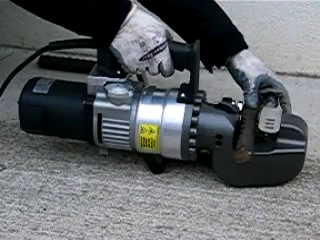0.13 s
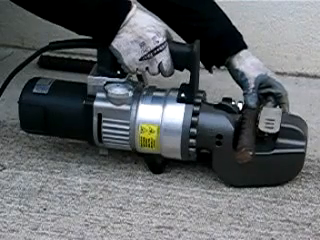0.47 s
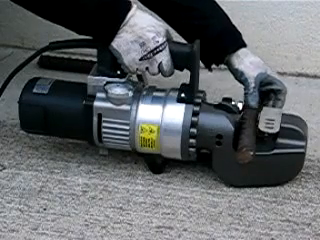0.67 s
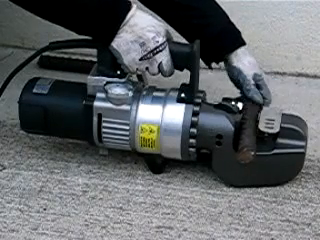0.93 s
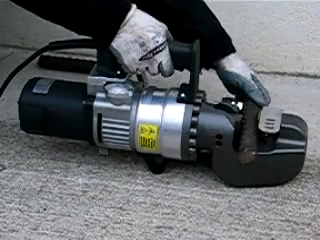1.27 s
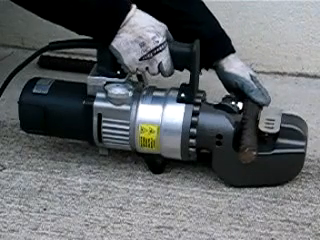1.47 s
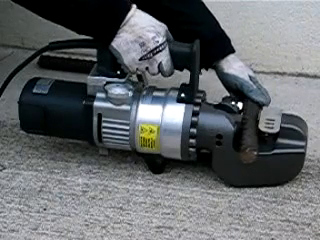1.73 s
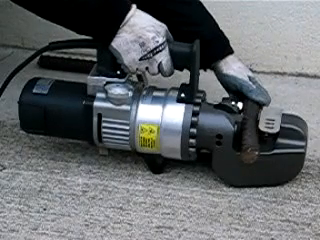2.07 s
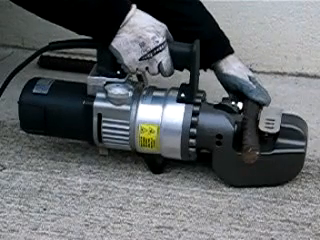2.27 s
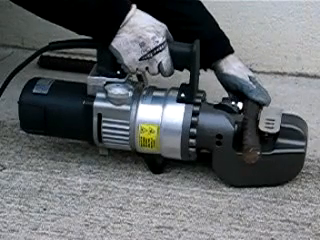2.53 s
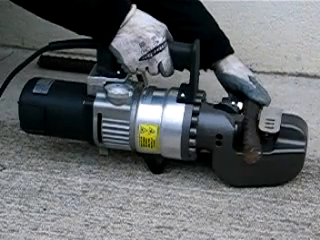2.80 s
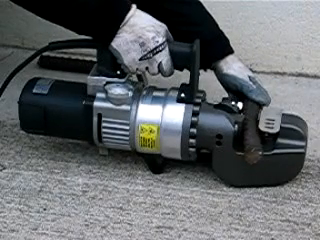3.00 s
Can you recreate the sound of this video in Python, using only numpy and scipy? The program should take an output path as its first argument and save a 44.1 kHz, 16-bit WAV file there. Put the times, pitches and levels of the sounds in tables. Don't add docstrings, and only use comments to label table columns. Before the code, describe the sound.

A loud, buzzy power-shear motor whine glides downward by about an octave as it bites steel

```python
import sys
import numpy as np
from scipy import signal
from scipy.fft import rfft, irfft, next_fast_len
from scipy.io import wavfile
from scipy.ndimage import uniform_filter1d

SR = 44100
rng = np.random.default_rng(int(sys.argv[2]) if len(sys.argv) > 2 else 0)


def natural_amplitude(level_db):
    exponent = np.asarray(level_db, float) / 20
    return 10 ** exponent


def to_wav(sig):
    pcm = np.clip(np.atleast_2d(sig), -1, 1) * 32767
    pcm = np.round(pcm).astype(np.int16)
    wavfile.write(sys.argv[1], SR, pcm.T)


N = 140238


def unit(x):
    return x / np.sqrt(np.mean(x ** 2) + 1e-20)


def along(points, hz):
    f, v = np.transpose(points)
    return natural_amplitude(np.interp(np.log(hz + 1), np.log(f + 1), v))


def curves(rows):
    s, *cols = np.transpose(rows)
    return [np.interp(np.arange(N) / SR, s, c) for c in cols]


def wobble(rate):
    return np.interp(np.arange(N) * rate / SR, np.arange(200), rng.standard_normal(200))


def filtered(x, response):
    m = next_fast_len(N + 8192)
    return irfft(rfft(x, m) * response(np.fft.rfftfreq(m, 1 / SR)), m)[:N]


def noise(spectrum):
    return unit(filtered(rng.standard_normal(N), lambda hz: along(spectrum, hz)))


def motor():
    # time in seconds, shaft speed in Hz, level in dB
    shaft_course = [(0.0, 221.6, -23.5), (0.19, 224.2, -25.5), (0.26, 222, -24.5), (0.35, 219.2, -24.5),
                    (0.45, 211.6, -24.5), (0.7, 193.1, -25), (0.9, 176.3, -23.5), (1.14, 157.1, -25.5),
                    (1.34, 145.4, -23), (1.49, 138.6, -23.5), (1.56, 135.8, -24), (1.81, 128.7, -24.5),
                    (2.01, 125.1, -24.5), (2.15, 123.7, -24), (2.63, 115.8, -24), (2.73, 115.4, -24.5),
                    (3.18, 110.7, -24)]
    hiss_loads = [0, .25, .65, 1]
    hiss_load_db = [-0.98, -1.6, 0.49, 1]
    free_hz, loaded_hz, speed_jitter = 223, 111, 0.00049
    tones_db, hiss_db = -1.5, -6.5

    speed_hz, level_db = curves(shaft_course)
    speed_hz = uniform_filter1d(speed_hz, size=3001, mode="nearest")
    turn = 2 * np.pi * np.cumsum(speed_hz * (1 + speed_jitter * wobble(30))) / SR
    load = np.clip((free_hz - speed_hz) / (free_hz - loaded_hz), 0, 1)

    tones = natural_amplitude(tones_db) * shaft_orders(turn, load)
    hiss = natural_amplitude(hiss_db + np.interp(load, hiss_loads, hiss_load_db)) * brush_hiss(turn)
    return natural_amplitude(level_db) * (tones + hiss) + shudder(turn)


def shaft_orders(turn, load):
    # levels of eight successive shaft orders in dB, motor running free
    free_db = [(-18.5, -4, -11, -24.5, 4.5, 2, -3, 0.5), (-5, 10, 10, -4.5, 8, -6, 3, 5),
               (1, 13, 8, -10, 3.5, 5.5, 8.5, 0.5), (5, -7.5, -0.5, -3.5, 0, 5, -11.5, -20),
               (-3, 9.5, -16.5, 1, -20, 2.5, -3, -10.5), (-16.5, -4.5, 19.5, 2.5, 5, -4.5, 18, -3)]
    biting_db = [(-7.5, -13.5, -2.5, -1.5, 4.5, -5.5, 1.5, 2), (5, -1, 2.5, 7, 13.5, 2.5, 6.5, 9.5),
                 (10.5, -2.5, 12, 1, 10.5, 3, 0.5, 13), (-3.5, -2, 2.5, -3, 5.2, 9.5, -3.5, -13.5),
                 (0.3, 3.5, -6.5, -6, -8.5, 5, -5, 1.5), (-1.5, 3.5, 7.5, -3.5, 3, -5, -4.5, -4.5)]
    loaded_db = [(-2, -23, -20, -1, 5.5, -5.5, 7, 12), (3, 8.5, -8, 5, 8, -2.5, 3, 3.5),
                 (5, 8, 6, -4, -2, 7.5, -6, 0), (0.5, -0.5, 9.5, 0.5, 2.5, 10, -0.5, -6.5),
                 (12.5, 2, 3.5, 0, -17.5, 6.5, -2, -7.5), (-5, -27, 3.5, -8, -12, -6, -0.5, -21)]
    # time in seconds, phase scatter 0-1
    phase_scatter = [
        (0, 1),
        (.4, .9),
        (.55, .4),
        (.68, .4),
        (.82, .8),
        (1.0, .55),
        (1.2, .9),
        (3.18, 1),
    ]
    biting_load, waver_db, blur_rad = 0.6, 1.8, 0.07

    scatter, = curves(phase_scatter)
    stages = zip(np.ravel(free_db), np.ravel(biting_db), np.ravel(loaded_db))
    orders = np.zeros(N)
    for order, stages_db in enumerate(stages, 1):
        order_db = np.interp(load, [0, biting_load, 1], stages_db)
        order_db = order_db + shifted_db(order) + waver_db * wobble(14)
        start_phase = scatter * rng.uniform(-np.pi, np.pi)
        blur = blur_rad * load * max(order - 25, 0) * wobble(50)
        orders += natural_amplitude(order_db) * np.sin(order * turn + start_phase + blur)
    return unit(filtered(orders, lambda hz: abs(housing(hz))))


def shifted_db(order):
    # start in seconds, length in seconds, shaft order, change in dB
    order_shifts = [(0.159, 0.79, 20, 6), (0.2, 0.38, 18, -8), (0.202, 1.2, 13, -0.5),
                    (0.28, 0.16, 12, 17.5), (0.383, 0.33, 17, 9.5), (0.4, 1.8, 15, -3), (0.638, 0.45, 18, 6),
                    (0.78, 1, 30, -7.5), (0.919, 0.33, 25, 14.5), (1.02, 0.88, 16, -5),
                    (1.04, 0.48, 24, -11.5), (1.061, 0.8, 10, 7.5), (1.08, 3, 33, -1.5),
                    (1.16, 0.38, 34, -13), (1.181, 0.38, 19, -14.5), (1.262, 1.3, 38, 1),
                    (1.399, 0.77, 12, -10.5), (1.438, 0.87, 27, -5), (1.623, 1.54, 22, -8),
                    (1.742, 0.93, 29, 3.5), (1.779, 0.28, 17, 6), (1.881, 1.6, 32, -1.5),
                    (2.138, 0.62, 25, -7.5), (2.181, 0.98, 30, -2), (2.239, 0.54, 17, -11.5),
                    (2.622, 0.35, 28, 5), (2.658, 0.58, 13, -7.5), (2.74, 0.25, 34, 3),
                    (0, 0.13, 11, 6),
        (-0.5, 0.46, 16, 4),
        (-1.7, 0.14, 19, 5),
        (0.8, .2, 8, 7.5),
        (3, 1.1, 27, 0),
        (1.5, 0.26, 7, -3.5),
        (2.26, 2, 43, -8),
        (1.5, 1.7, 46, -7),
                    (0.0, 0.11, 15, -7.5), (0.0, 0.092, 16, 5.5), (0.0, 0.36, 25, 8),
                      (0.0, 0.87, 20, 9.5), (0.0, 0.52, 15, -1.5), (0.122, 0.72, 14, 8.5),
                      (0.156, 0.12, 19, 7.5), (0.202, 0.16, 21, 5.5), (0.323, 0.72, 19, -4),
                      (0.364, 0.83, 25, -2), (0.48, 0.28, 9, 7), (0.48, 0.41, 16, -8),
                      (0.523, 0.48, 24, -1.5), (0.638, 0.6, 23, 0), (0.714, 0.22, 11, -8.5),
                      (0.802, 0.36, 9, -10), (0.84, 0.76, 29, -6), (0.879, 0.13, 13, -12),
                      (0.9, 0.12, 21, -8), (0.877, 0.65, 32, 6.5), (1.043, 0.13, 20, -11.5),
                      (1.159, 0.12, 14, 5.5), (1.158, 0.76, 20, 5.5), (1.203, 0.6, 33, -0.5),
                      (1.198, 0.88, 37, 6.5), (1.275, 0.85, 13, -4),
                    (1.32, 0.93, 38, -12), (1.362, 0.72, 31, 4), (1.396, 0.071, 24, 11),
                       (1.399, 0.64, 21, -4), (1.44, 0.18, 15, 6), (1.44, 0.64, 35, -7.2),
                       (1.521, 0.13, 26, -13), (1.558, 0.32, 9, 9), (1.606, 0.26, 19, -6),
                       (1.631, 0.31, 23, 3), (1.644, 0.43, 28, -9.5), (1.88, 0.44, 32, 9.5),
                       (2.082, 0.24, 15, -14.5), (2.166, 0.16, 30, -3), (2.165, 0.24, 33, -6.5),
                       (2.2, 0.87, 31, 2.5), (2.199, 0.88, 23, 3.5), (2.204, 0.92, 38, -8),
                       (2.321, 0.28, 22, 7), (2.368, 0.69, 32, 10), (2.4, 0.35, 30, -13.5),
                       (2.4, 0.59, 35, -10), (2.521, 0.49, 37, 18), (2.519, 0.89, 41, -12.5),
                       (2.597, 0.22, 39, 5), (2.597, 0.56, 15, -4.5), (2.598, 0.67, 33, -1.5),
                       (2.684, 0.48, 11, 12), (2.685, 0.61, 21, 6.5), (2.723, 0.52, 24, 8.5),
                       (2.84, 0.16, 20, 10.5), (2.921, 0.18, 28, 3), (3.0, 0.16, 16, 6.5),
                       (3.0, 0.1, 27, -5.5)]

    steps = np.zeros(N)
    for s, length, k, db in order_shifts:
        if round(k) == order:
            start, stop = round(s * SR), round((s + length) * SR)
            steps[max(start, 0):max(stop, 0)] += db
    return uniform_filter1d(steps, size=1601, mode="nearest")


def housing(f):
    # resonance in Hz, width in Hz, level in dB
    casing_modes = [(202, 81, -6.5), (570, 169, -3), (933.4, 48.7, -0.5), (1332, 134, -11),
                    (1641, 93.4, -1), (2023, 119, -5), (2502, 111, -9), (2838, 142, -2.5), (3130, 203, -1),
                    (3736, 363, -4.5), (4367, 85, -7.5), (4523, 63, -3.5), (4890, 280, -6),
                    (5334, 115, -1.5)]
    response = 0
    for k, (centre, width, db) in enumerate(casing_modes):
        damping = 1j * f * width
        response = response + (-1) ** k * natural_amplitude(db) * damping / (centre * centre - f * f + damping)
    return response


def brush_hiss(turn):
    # frequency in Hz, level in dB per Hz
    hiss_colour = [(100, -18.5), (400, -1.5), (1200, 0.5), (2300, 4), (3000, 1.5), (4000, 6.5), (5000, 1),
                   (6000, 6)]
    gated, direct = 0.34, 0.38
    brushes = noise(hiss_colour) * (1 + gated * np.cos(turn))
    hiss = unit(filtered(brushes, lambda hz: direct + abs(housing(hz))))
    return unit(patchy(hiss, depth_db=2))


def patchy(x, depth_db):
    z = signal.stft(x, nperseg=512)[2]
    field = uniform_filter1d(rng.standard_normal(z.shape), size=5, axis=0)
    field = uniform_filter1d(field, size=20, axis=1)
    return signal.istft(z * natural_amplitude(depth_db * unit(field)), nperseg=512)[1][:N]


def shudder(turn):
    # frequency in Hz, level in dB per Hz
    groan_colour = [(70, -16), (120, -3), (170, -14), (240, -5), (330, -12.5), (450, -26)]
    start_s, rise_s = 2.6, 0.12
    shake_db, rough_db, groan_db = -41, 2.5, -42
    onset = np.clip((np.arange(N) / SR - start_s) / rise_s, 0, 1)
    shake = natural_amplitude(shake_db + rough_db * wobble(35)) * np.sqrt(2) * np.sin(2 * turn)
    return onset * (shake + natural_amplitude(groan_db) * noise(groan_colour))


def scrape():
    # time in seconds, level in dB
    scrape_course = [
        (0, -36),
        (.15, -35),
        (.22, -42.5),
        (.5, -42),
        (.9, -45.5),
        (1.4, -68),
    ]
    # frequency in Hz, level in dB per Hz
    jaw_colour = [(120, -6.5), (300, -1.5), (550, 6.5), (800, -7), (1100, -34.5), (2500, -2.5),
                  (4000, -19.5)]
    level_db, = curves(scrape_course)
    return natural_amplitude(level_db + 1.5 * wobble(45)) * noise(jaw_colour)


def bite():
    # frequency in Hz, level in dB per Hz
    chatter_colour = [(2300, -32), (2900, -8), (3400, 2), (4200, -3.5), (5000, -20)]
    start_s, length_s, bite_db = 0.145, 0.085, -33
    u = (np.arange(N) / SR - start_s) / length_s
    envelope = np.clip(np.minimum(8 * u, 2 * (1 - u)), 0, 1)
    return natural_amplitude(bite_db + 1.5 * wobble(46)) * envelope * noise(chatter_colour)


def yard():
    # frequency in Hz, level in dB per Hz
    rumble_colour = [(20, -4.5), (32, -9.5), (45, -5), (72, -20), (135, -11), (165, -12), (250, -15.5),
                     (450, -28.5)]
    # frequency in Hz, level in dB rms
    hum_tones = [(102.3, -59), (209.9, -54.5)]
    t = np.arange(N) / SR
    hum = np.zeros(N)
    for hz, db in hum_tones:
        hum += natural_amplitude(db + 1.5 * wobble(5.0)) * np.sqrt(2) * np.sin(2 * np.pi * hz * t)
    skirted = [(8, -22.0)] + list(rumble_colour) + [(900, -70.0)]
    return natural_amplitude(-50 + 4.2 * wobble(6.1)) * noise(skirted) + hum


def scene():
    return (motor() + scrape() + bite() + yard())[None]


def coarse_sampling(x):
    # frequency in Hz, gain in dB
    before_sampling = [(4500, 0), (5500, -1), (6200, -11), (7000, -42)]
    # frequency in Hz, gain in dB
    after_sampling = [(4800, 0), (5500, -3.5), (6000, -10), (6500, -21.5), (7000, -36), (7150, -85)]
    every = 4
    kept = filtered(x, lambda hz: along(before_sampling, hz)) * every * (np.arange(N) % every == 0)
    return filtered(kept, lambda hz: along(after_sampling, hz) * (hz < 7300))


def holes(x):
    from_hz, all_hz, hole_db = 5900, 7600, -28
    hz, t, z = signal.stft(x, SR, nperseg=2048)
    draw = rng.random((257, len(t) // 2 + 1))
    draw = np.repeat(np.repeat(draw, 4, axis=0), 2, axis=1)[:len(hz), :len(t)]
    share = np.clip((hz - from_hz) / (all_hz - from_hz), 0, 1)[:, None]
    return signal.istft(z * np.where(draw < share, natural_amplitude(hole_db), 1), SR, nperseg=2048)[1][:N]


def band_limit(x):
    return signal.sosfilt(signal.butter(12, 7100, fs=SR, output="sos"), x)


def record(dry):
    offset, dither_db = -0.025, -79.5
    x = holes(coarse_sampling(dry[0]))
    x = x + offset + natural_amplitude(dither_db) * rng.standard_normal(N)
    return band_limit(x[None])


dry = scene()
out = record(dry)
to_wav(out)
```